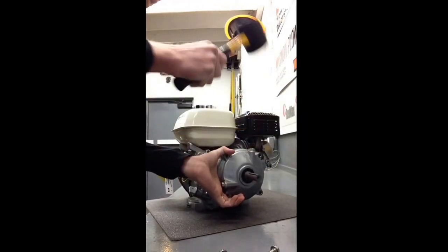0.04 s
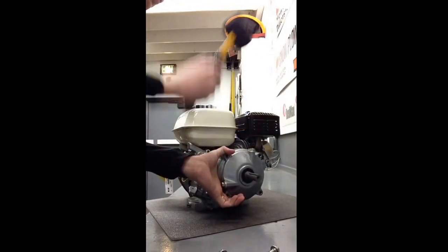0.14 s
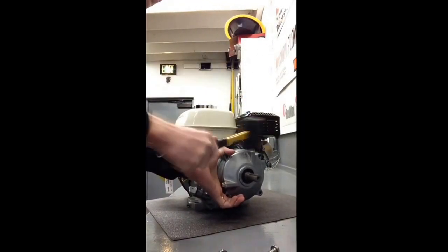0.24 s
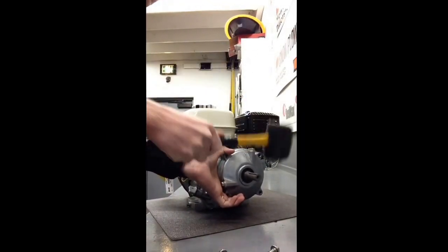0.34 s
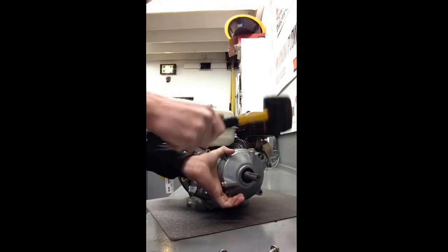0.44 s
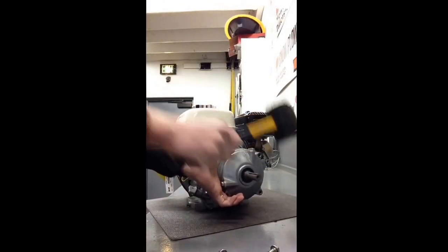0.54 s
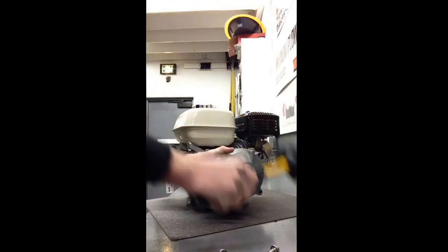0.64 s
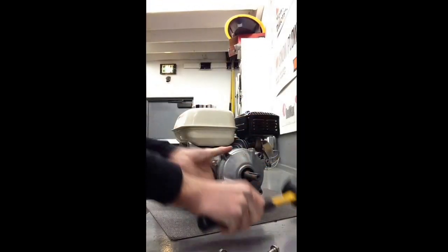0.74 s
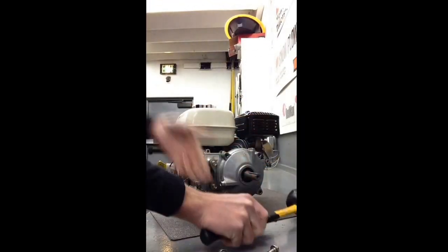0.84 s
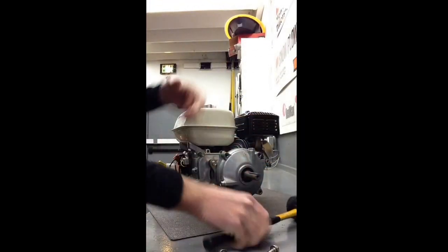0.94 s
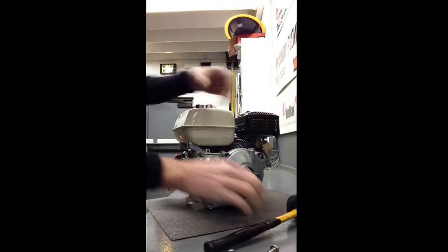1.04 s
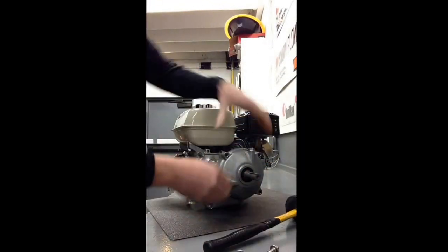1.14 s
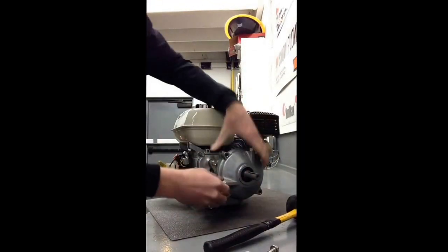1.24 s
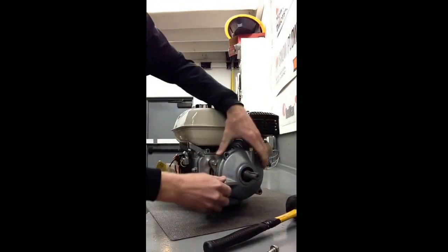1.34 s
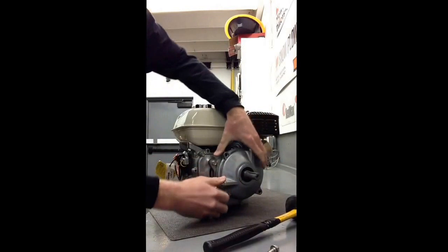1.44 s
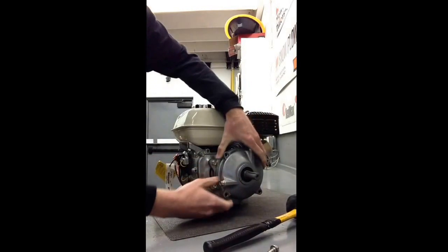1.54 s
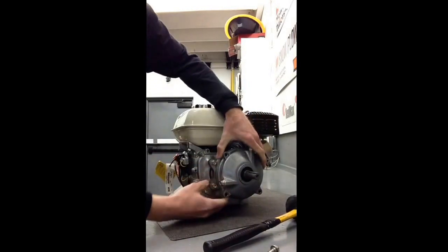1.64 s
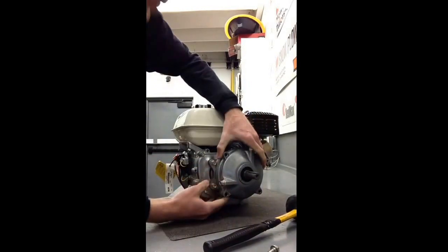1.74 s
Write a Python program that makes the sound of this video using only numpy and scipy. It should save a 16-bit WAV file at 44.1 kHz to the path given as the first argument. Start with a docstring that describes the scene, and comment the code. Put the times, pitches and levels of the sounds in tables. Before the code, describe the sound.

A rubber mallet strikes a small engine's metal cover, then thuds down on a matted bench

```python
"""The ring of an earlier blow is still fading as a rubber mallet strikes a small engine's metal cover.
The mallet is laid down: its head thuds and bounces on the matted bench, then the handle clacks twice,
with a fainter third tap. Faint clicks come before the thuds and at the end, as hands grip the cover.
Struck bodies are sums of fading sines, contacts are fading coloured noise, and the hard-walled workshop
adds a diffuse tail to each hit. The microphone hears it all over a low shop hum and hiss."""
import sys
import numpy as np
from scipy import signal
from scipy.fft import rfft, irfft
from scipy.io import wavfile

SR = 44100
rng = np.random.default_rng(int(sys.argv[2]) if len(sys.argv) > 2 else 0)


def generate_wav(sig):
    """Save sig (samples, or channels by samples) to the path in sys.argv[1] as 16-bit PCM at SR."""
    pcm = np.round(np.clip(np.atleast_2d(sig).T, -1, 1) * 32767).astype(np.int16)
    wavfile.write(sys.argv[1], SR, pcm)


N = 79380  # samples heard, 1.8 s
LEAD = SR // 2 + SR // 10  # samples played before the start, 0.6 s
RING_RISE_S = 0.000517  # onset of the cover and bench rings


# Mallet blows on the cover, the first before the start. Each row: start in seconds, level in dB.
BLOWS = [(-.5, -7), (0.2174, -13.5)]
# Ringing modes of cover and engine. Each row: frequency in Hz, level in dB, 60 dB decay in seconds.
COVER_MODES = [(142.7, -19.5, 0.63), (167.6, -24, .3), (464, -8, 0.23), (584.3, -5, 0.35), (760, -30, .25),
               (857, -0.5, 0.34), (877.2, -6.5, 0.8), (902, -19, 0.44), (970, -11.5, .4), (1162, -11, .3),
               (1355, -13, 0.42), (1906, -30, 0.93), (2780, -13.5, .2), (5700, -24, 0.056)]
# Colour of the first instant of contact. Each row: frequency in Hz, density in dB per Hz.
CONTACT_COLOUR = [(150, -31), (500, -7.5), (1000, 1.5), (2700, -6), (4300, -15), (5700, -4.5),
                  (7000, -20.5), (9500, -15.5), (15000, -20.5)]
# Colour of the crack's room tail. Each row: frequency in Hz, density in dB per Hz.
CRACK_TAIL_COLOUR = [(65, -51), (105, -9), (250, -14.5), (380, -16.5), (580, -13), (760, -12), (880, -1.5),
                     (990, -5.5), (1200, -16.5), (1500, -18), (2700, -18), (3300, -23.5), (4600, -27.5),
                     (5600, -28), (7000, -34), (10000, -26), (15000, -34)]
CONTACT_DB, CONTACT_T60_S, CRACK_TAIL_DB = 8.5, 0.021, 34  # levels relative to the blow


def mallet_blows():
    """The cover rings in its modes; the noisy crack at contact fills the room."""
    out = np.zeros(LEAD + N)
    for start, db in BLOWS:
        contact = noise(CONTACT_COLOUR, SR) * fade(CONTACT_T60_S)
        add(out, start, undb(db) * ring(COVER_MODES, RING_RISE_S))
        add(out, start, undb(db + CONTACT_DB) * contact)
        add(out, start, undb(db + CRACK_TAIL_DB) * diffuse_tail(CRACK_TAIL_COLOUR))
    return out


# Mallet head landing on the bench. Each row: start in seconds, level in dB, pitch factor.
THUDS = [(.776, -11.5, 1.), (.827, -32.5, 0.73), (0.856, -51, 1), (0.8873, -20.5, 1.09),
         (0.911, -28.5, 0.96), (0.965, -22, 0.946)]
# Bench modes. Each row: frequency in Hz before the pitch factor, level in dB, 60 dB decay in seconds.
BENCH_MODES = [(221, 3, 0.04), (127.4, -19.5, 0.2), (196, -11, 0.053), (390, -9.5, 0.066)]
# Colour of rubber on the mat. Each row: frequency in Hz, density in dB per Hz.
SLAP_COLOUR = [(300, 18.5), (1200, 0.5), (3500, -11), (7000, -55)]
PUSH_S, BENCH_CUT_HZ, THUD_WET_DB = 0.0027, 125, -7.5
SLAP_DB, SLAP_T60_S, SLAP_RISE_S = -16.5, 0.13, 0.0031  # level relative to the thud


def head_thuds():
    """A soft push rings the bench, with a light slap; the bench radiates little deep bass."""
    out = np.zeros(LEAD + N)
    push = np.hanning(int(PUSH_S * SR) + 2)
    push /= push.sum()
    slap_rise = np.minimum(np.arange(SR) / SR / SLAP_RISE_S, 1)
    for start, db, pitch in THUDS:
        modes = [(hz * pitch, mode_db, t60) for hz, mode_db, t60 in BENCH_MODES]
        body = np.convolve(ring(modes, RING_RISE_S), push)
        slap = noise(SLAP_COLOUR, SR) * fade(SLAP_T60_S) * slap_rise
        add(out, start, undb(db) * body)
        add(out, start, undb(db + SLAP_DB) * slap)
    bass_cut = signal.butter(4, BENCH_CUT_HZ, "high", fs=SR, output="sos")
    return in_room(signal.sosfilt(bass_cut, out), THUD_WET_DB)


# Handle on the bench edge. Each row: start in seconds, level in dB, extra level of the direct snap in dB.
CLACKS = [(0.9531, -25.5, -0.5), (0.9958, -30.5, 5.5), (1.015, -41.5, 3)]
# Handle modes. Each row: frequency in Hz, level in dB, 60 dB decay in seconds.
HANDLE_MODES = [(658, -9, 0.079), (833, -2, 0.037), (1335, 9.5, 0.017), (1540, 7.5, 0.013),
                (2210, -19, 0.017), (2750, -12, 0.031), (4080, -13, 0.045)]
# Colour of the snap and its room tail. Each row: frequency in Hz, density in dB per Hz.
SNAP_COLOUR = [(450, -13), (650, 3.5), (1000, -7.5), (1400, -2), (2300, -4), (3500, -12.5), (5700, -25),
               (14000, -43)]
SNAP_DB, SNAP_T60_S, SNAP_TAIL_DB = 1.5, 0.019, 21.5  # levels relative to the clack
HANDLE_RISE_S, CLACK_WET_DB = 0.0013, -12.5
SNAP_TAIL_SHARE = 0.79  # share of the room's decay time


def handle_clacks():
    """The handle hits the bench edge: its modes ring and a noisy snap carries its own room tail."""
    rings, snaps = np.zeros((2, LEAD + N))
    for start, db, snap_db in CLACKS:
        snap = noise(SNAP_COLOUR, SR) * fade(SNAP_T60_S)
        add(rings, start, -undb(db) * ring(HANDLE_MODES, HANDLE_RISE_S))  # first swing inverted
        add(snaps, start, undb(db + snap_db + SNAP_DB) * snap)
        add(snaps, start, undb(db + SNAP_TAIL_DB) * diffuse_tail(SNAP_COLOUR, SNAP_TAIL_SHARE))
    return in_room(rings, CLACK_WET_DB) + snaps


# Faint clicks. Each row: start in seconds, level in dB, centre in Hz, spread as a ratio.
CLICKS = [(0.692, -59, 4240, 1.46), (1.347, -47.5, 2270, 2.3), (1.359, -52.5, 1180, 1.5)]
CLICK_T60_S, CLICK_WET_DB = 0.063, -7.5


def faint_clicks():
    """Tiny fading bursts of noise, strongest in a band around one pitch."""
    out = np.zeros(LEAD + N)
    for start, db, hz, spread in CLICKS:
        low = hz / spread
        high = hz * np.sqrt(spread)
        colour = [(low / 1.3, -20), (low, 0), (high, 0), (high * 1.2, -20)]
        add(out, start, undb(db) * noise(colour, SR) * fade(CLICK_T60_S))
    return in_room(out, CLICK_WET_DB)


# Decay of the hard-walled room. Each row: frequency in Hz, full 60 dB decay in seconds.
ROOM_DECAY = [(60, 0.53), (160, 0.39), (420, 0.43), (1100, 0.41), (2900, 0.43), (7700, .32), (15000, 0.18)]
ROOM_BUILD_S = 0.0031  # time constant of the tail's build-up


def diffuse_tail(colour, share=1):
    """Room tail of energy 1: coloured noise fading band by band; share scales the decay time."""
    tail = np.zeros(SR)
    source = noise(colour, SR)
    for hz in 45 * 2 ** np.arange(0, 8.6, .5):  # half-octave steps
        band_pass = signal.butter(2, [hz / 1.19, hz * 1.19], "band", fs=SR, output="sos")
        band = signal.sosfiltfilt(band_pass, source)
        tail += band * fade(share * read(ROOM_DECAY, hz))
    tail *= 1 - np.exp(-np.arange(SR) / SR / ROOM_BUILD_S)
    return tail / np.sqrt(np.sum(tail ** 2))


def in_room(direct, wet_db):
    """Direct sound plus its smear through a diffuse tail of flat colour."""
    tail = diffuse_tail([(40, 0), (16000, 0)])
    return direct + undb(wet_db) * signal.fftconvolve(direct, tail)[:len(direct)]


# Colour of shop hum and microphone hiss. Each row: frequency in Hz, density in dB per Hz.
FLOOR_COLOUR = [(24, -71), (40, -46.5), (86, -40), (108, -5), (186, -2), (277, -7.5), (313, -6.5),
                (490, -7), (541, -10), (1170, -16.5), (1820, -16), (2640, -22.5), (15000, -15)]
# Steady hum tones. Each row: frequency in Hz, rms level in dB.
HUM_TONES = [(118.4, -72.5), (183.0, -70)]
FLOOR_DB = -53  # rms


def shop_floor():
    """Broad hum and hiss as steady coloured noise, with a few sine tones of random phase."""
    t = np.arange(N) / SR
    out = undb(FLOOR_DB) * noise(FLOOR_COLOUR, N)
    for hz, db in HUM_TONES:
        peak = np.sqrt(2) * undb(db)
        out += peak * np.sin(2 * np.pi * (hz * t + rng.random()))
    return out


def undb(db):
    """Decibels to an amplitude factor."""
    return 10 ** (np.asarray(db) / 20)


def read(table, hz):
    """Table value at hz, interpolated on a log frequency axis."""
    table_hz, values = np.array(table).T
    return np.interp(np.log(np.maximum(hz, 1)), np.log(table_hz), values)


def noise(colour, size):
    """Noise of rms 1 with a (Hz, dB) colour."""
    spectrum = rfft(rng.standard_normal(size))
    gain = undb(read(colour, np.fft.rfftfreq(size, 1 / SR)))
    x = irfft(spectrum * gain, size)
    return x / x.std()


def fade(t60, size=SR):
    """Exponential decay that falls 60 dB in t60 seconds."""
    return np.exp(-np.log(1000) * np.arange(size) / SR / t60)


def ring(modes, rise_s):
    """Struck modes, each a fading sine; neighbours start in opposite directions."""
    t = np.arange(2 * SR) / SR
    out = np.zeros(len(t))
    for k, (hz, db, t60) in enumerate(modes):
        sine = np.sin(2 * np.pi * hz * t)
        out += (-1) ** k * undb(db) * sine * fade(t60, len(t))
    return out * np.minimum(t / rise_s, 1)


def add(out, start, x):
    """Mix x in at start seconds of a track that begins LEAD samples early."""
    i = LEAD + int(start * SR)
    out[i:i + len(x)] += x[:len(out) - i]


def scene():
    """All hits with the lead-in dropped, over the shop's hum and hiss."""
    hits = mallet_blows() + head_thuds() + handle_clacks() + faint_clicks()
    return (hits[LEAD:] + shop_floor())[None]


LOW_CUT_HZ, TOP_HZ, CLIP = 80, 15400, .85  # CLIP is the ceiling of the rounded peaks, before the top cut


def record(dry):
    """The microphone drops the deep bass, rounds peaks and cuts the top."""
    bass_cut = signal.butter(4, LOW_CUT_HZ, "high", fs=SR, output="sos")
    top_cut = signal.ellip(10, .2, 70, TOP_HZ, fs=SR, output="sos")
    x = signal.sosfilt(bass_cut, dry)
    rounded = CLIP * np.tanh(x / CLIP)
    return signal.sosfilt(top_cut, rounded)


dry = scene()
out = record(dry)
generate_wav(out)
```